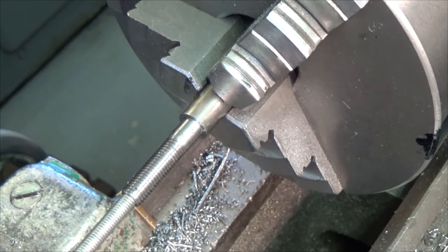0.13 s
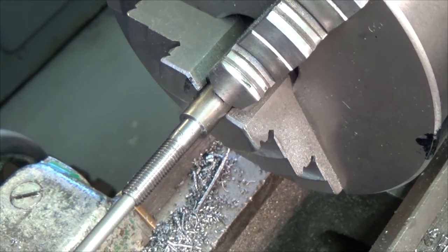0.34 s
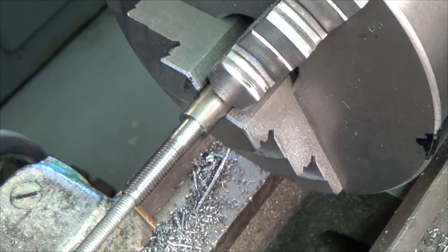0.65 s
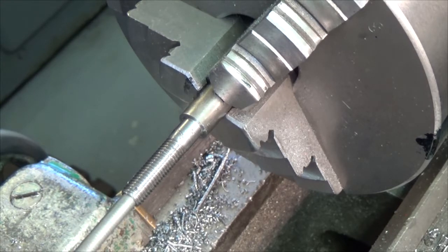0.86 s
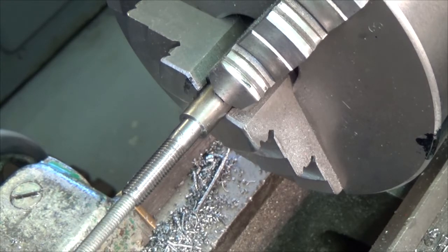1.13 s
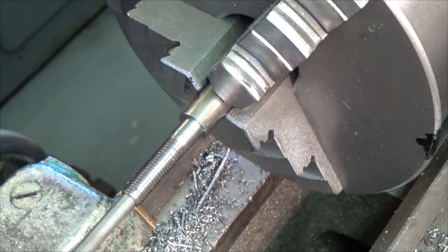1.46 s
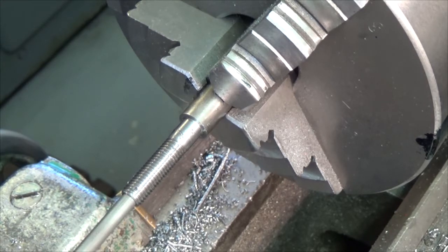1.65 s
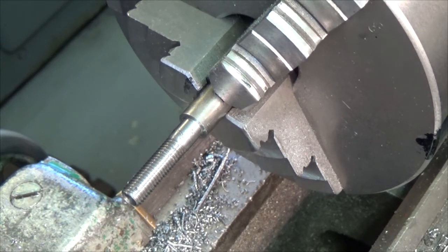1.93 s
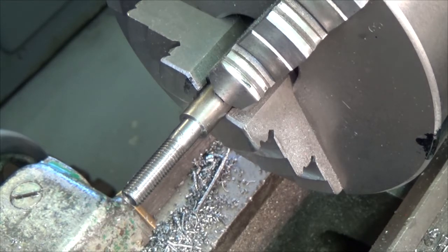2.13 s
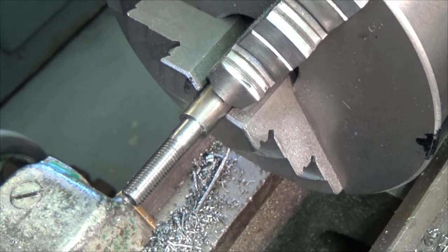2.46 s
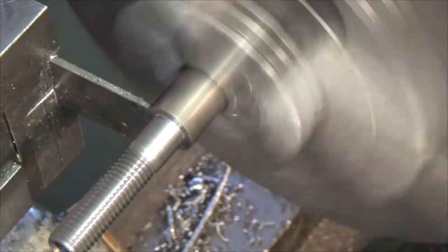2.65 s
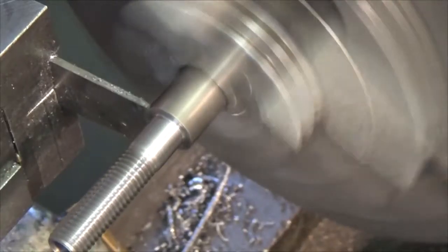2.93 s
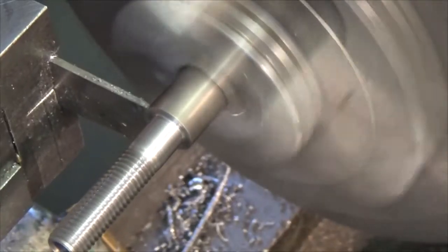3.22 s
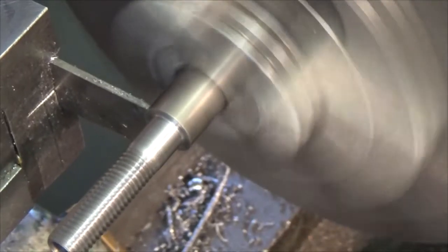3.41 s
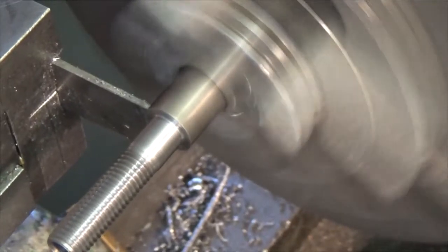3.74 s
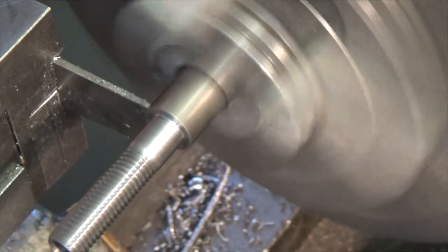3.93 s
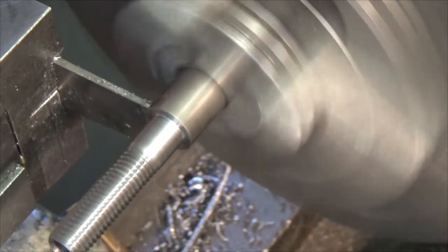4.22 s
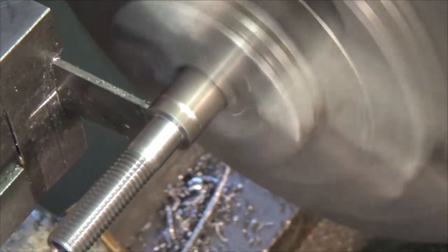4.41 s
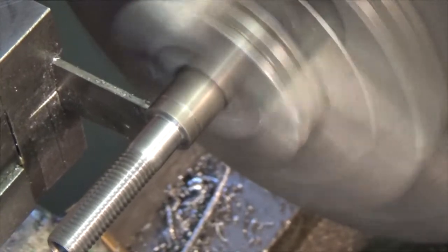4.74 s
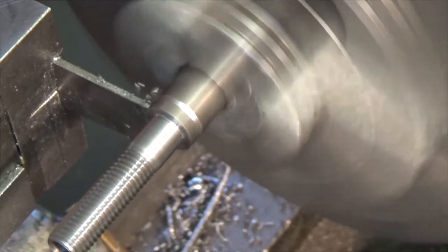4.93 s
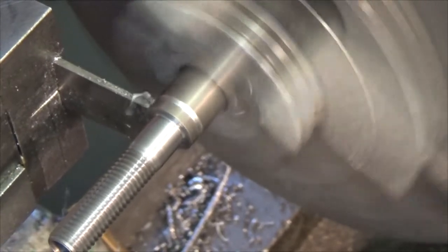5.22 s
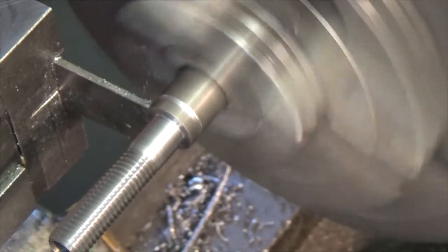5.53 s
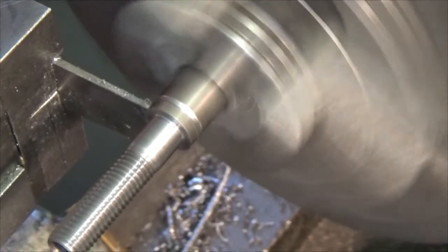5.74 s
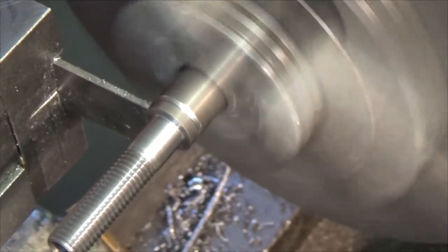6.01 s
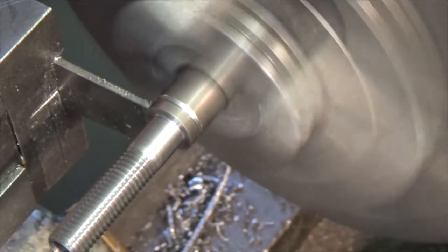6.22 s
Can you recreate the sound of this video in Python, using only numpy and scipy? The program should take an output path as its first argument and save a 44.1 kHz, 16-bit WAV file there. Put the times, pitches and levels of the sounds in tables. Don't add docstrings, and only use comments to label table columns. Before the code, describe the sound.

In a quiet workshop with faint hum, a threaded steel part is stroked and tapped close by: gritty scrapes, sharp ticks, small ringing knocks, louder clinks as it is set down, then near silence. Suddenly a lathe is running, clattering and rumbling with rapid squeaky belt chirps. The tool bites in short, very high shrieks with crisp chip snaps, then holds a wavering squeal while automatic gain pushes the machine far down.

```python
import sys
import numpy as np
from scipy import signal
from scipy.fft import rfft, irfft
from scipy.io import wavfile
from scipy.ndimage import uniform_filter1d, minimum_filter1d

SR = 44100
rng = np.random.default_rng(int(sys.argv[2]) if len(sys.argv) > 2 else 0)


def rack_gain(trim_db):
    fader = np.asarray(trim_db, float)
    return 10 ** (fader / 20)


def unload_wav(signal):
    wavfile.write(
        sys.argv[1],
        SR,
        np.round(np.clip(np.atleast_2d(signal).T, -1, 1) * 32767).astype(np.int16),
    )


N = 280917
T = np.arange(N) / SR
CUT_S = 2.568
LAP_S, TURN_S = .1124, .1345

# (frequency [Hz], level [dB])
MACHINE = [(30, -26), (78, -14), (115, 0), (189, -17), (384, -2), (740, -1.5), (1150, -1), (1460, -7),
           (1750, -4), (2200, -2.5), (2700, -5.5), (3300, -15.5), (4150, -8), (4750, -16.5), (5250, -13),
           (5800, -9.5), (6450, -7.5), (7100, -17), (8300, -18), (9200, -13), (11000, -29), (16000, -29)]
# (time [s], frequency [Hz], level [dB])
GRIP = (2.8, 3150, -15)
# (share of turn, pitch shift [Hz], level [dB])
RUNOUT = [(0, -170, 1), (.03, 201.5, -4.5), (.25, 80, -3), (.36, -87.5, -2.5), (.42, -165, -12.5),
          (.48, -130, -1), (.57, 121, -5), (.68, 434, -4.8), (.85, -285, 1), (.95, -295, -1.5),
          (1, -170, 1.5)]
# (time [s], level [dB], mean frequency [Hz], warble depth, depth of the level dips)
CUT = [
    (5.43, -18, 11720, 0.21, 0.43),
    (5.55, -17, 11990, 1.2, 0.73),
    (5.75, -18, 11970, 1.4, 0.83),
    (5.95, -16.5, 12180, 0.85, 1.76),
    (6.2, -17, 12170, 0.94, 2.1),
    (6.31, -18.5, 12120, 1.4, 0.67),
    (6.333, -25, 11800, 0.33, .3),
    (6.34, -39, 11700, 0.13, .1),
    (6.37, -45, 12100, 0.24, .1),
]


def evened(x):
    return x / np.sqrt(np.mean(x ** 2) + 1e-20)


def curves(rows, t=T):
    s, *columns = np.transpose(rows)
    return [np.interp(t, s, c) for c in columns]


def colour(x, points, scale=1):
    f, db = np.transpose(points)
    hz = np.fft.rfftfreq(N, 1 / SR)
    gain_db = scale * np.interp(np.log(hz + 1), np.log(f), db)
    return irfft(rfft(x) * rack_gain(gain_db), N)


def drift(hz):
    sos = signal.butter(4, hz, fs=SR, output="sos")
    return evened(signal.sosfilt(sos, rng.standard_normal(N)))


def grit(spread_db, hz):
    return evened(rng.standard_normal(N) * rack_gain(spread_db * drift(hz)))


def resonate(x, hz, width, count=1):
    r = np.exp(-np.pi * width / SR)
    if np.ndim(hz) == 0:
        return 2 * signal.lfilter([1 - r], [1, -r * np.exp(2j * np.pi * hz / SR)], x).real
    turn = np.exp(2j * np.pi * np.cumsum(hz) / SR)
    smooth = signal.lfilter([(1 - r) ** count], np.poly([r] * count), x * turn.conj())
    return 2 * (turn * smooth).real


def ring(s, modes):
    out, at = np.zeros(N), round(s * SR)
    u = T[:min(SR, N - at)]
    out[at:at + SR] = sum(rack_gain(db - 60 * u / t60) * np.sin(2 * np.pi * hz * u) for hz, db, t60 in modes)
    return out


def swell(start, rise, hold, rise_db, fall_db, t=T):
    u = t - start
    rising = rise_db * np.log10(np.clip(u / max(rise, 1e-3), 1e-3, 1))
    return rising - fall_db * np.clip(u - rise - hold, 0, 1)


def room(x, t60, delay=300):
    t = T[:SR // 2]
    tail = rng.standard_normal((2, len(t))) * rack_gain(-60 * t / t60) * (t * SR > delay)
    return signal.fftconvolve(x[None], tail / np.linalg.norm(tail[0]), axes=1)[:, :N]


def shop():
    # (frequency [Hz], level [dB])
    air_spectrum = [(35, -30), (60, -25), (96, -7.5), (202, -7), (398, -11), (469, -15.5), (803, -15.5),
                    (3420, -27.5), (11300, -27), (16000, -31.5)]
    # (frequency [Hz], level [dB])
    hum_lines = [(48.4, -63), (152, -68.5), (199.2, -61), (299, -74.5), (398.4, -65.5), (802.1, -71)]
    air = colour(grit(1.2, hz=12) + .18 * rng.standard_normal((2, N)), air_spectrum)
    hum = sum(rack_gain(db + 2.5 * drift(6)) * np.sqrt(2) * np.sin(2 * np.pi * hz * T) for hz, db in hum_lines)
    return rack_gain(-53.5 - 2.0 * (T > 2.04)) * evened(air) + hum


def strokes():
    # (start [s], rise [s], hold [s], thread hiss [dB], body [dB])
    slides = [(0.067, 0.083, 0.021, -67, -45.5), (0.201, 0.038, 0.002, -36, -48),
              (0.24, 0.1, 0.048, -32, -34), (0.508, 0.04, 0.034, -31.5, -38),
              (0.596, 0.022, 0.0084, -20.5, -34.5), (0.749, 0.017, 0.067, -24.5, -38),
              (.857, 0.027, 0.0012, -35.5, -38.5), (0.914, 0.01, 0.0038, -17.5, -34),
              (0.944, 0.0031, 0.025, -28.5, -37.5), (1.01, 0.028, 0.0085, -38.5, -40.5),
              (1.086, 0.013, 0.024, -35, -40.5), (1.219, 0.024, 0.026, -36, -41),
              (1.314, 0.017, 0.014, -23.5, -34), (1.443, 0.013, 0.023, -24, -34),
              (1.521, 0.026, 0.0041, -15, -29.5), (1.649, 0.1, 0.066, -22.5, -34),
              (2.273, 0.021, 0.0033, -50, -56), (2.514, 0.022, 0.013, -43.5, -61)]
    rise_db, rest_s = 21, 2.04
    t = T[::16]
    hiss, body = [], []
    for s, rise, hold, hiss_db, body_db in slides:
        lift_db = 33 * (np.clip(t - s - rise - hold, 0, 1) / 0.021) ** 2
        hiss.append(hiss_db + swell(s, rise, hold, rise_db, 352, t) - lift_db)
        hiss.append(hiss_db - 19.5 + swell(s, rise, hold, rise_db, 232, t))
        body.append(body_db + swell(s, rise, hold, rise_db, 259, t))
    hiss.append(-39 + swell(1.67, 0, 0, rise_db, 35, t) - 400 * np.maximum(t - rest_s, 0))
    return [np.interp(T, t, np.maximum(np.max(db, axis=0), -100)) for db in (hiss, body)]


def ticks():
    # (time [s], peak level [dB])
    taps = [(0.0314, -34.5), (0.097, -31.5), (0.1217, -26.5), (0.126, -27.5), (0.161, -32), (0.1652, -28.5),
            (0.2015, -32), (0.2872, -23.5), (0.33, -19), (0.341, -15), (0.354, -13), (0.36, -15),
            (0.367, -19), (0.371, -20), (0.5177, -27), (0.532, -20), (0.555, -14), (0.579, -23),
            (0.605, -28), (0.62, -9), (0.7547, -25), (0.763, -26), (0.7844, -16), (0.788, -16),
            (0.808, -15), (0.823, -22), (0.8599, -24), (0.881, -24), (0.9148, -12), (0.949, -7.5),
            (0.9665, -21), (1.0286, -36), (1.039, -30), (1.093, -21), (1.107, -40), (1.2103, -30),
            (1.2326, -25), (1.303, -25), (1.3163, -11.5), (1.3472, -13.5), (1.45, -24), (1.527, -14),
            (1.5376, -21), (1.5434, -8), (1.555, -31), (1.6447, -35.5), (1.6896, -23), (1.711, -4.5),
            (1.719, -10.5), (1.7793, -18), (1.791, -8.5), (1.821, -5.5), (2.2994, -48)]
    # (frequency [Hz], level [dB], t60 [s])
    contact = [(7300, -19, 0.0093), (10300, 4, 0.011), (12500, -3, 0.011), (15400, -20, .005),
               (4440, -11, 0.011)]
    # (frequency [Hz], level [dB], t60 [s])
    set_down = [(4060, -45, .15), (4130, -46, .25), (4170, -48, .15), (10190, -32, .13), (10250, -33, .1),
                (10400, -33, .1), (4540, -48, .15), (6280, -48, .1), (2374, -43, .15)]
    strikes, power = np.zeros(N), np.zeros(N)
    u = T[:1000]
    burst = (1 - np.exp(-u / 0.00075)) * np.exp(-u / 0.0013)
    for s, db in taps:
        at = round(s * SR)
        strikes[at] = rack_gain(db - 17)
        power[at:][:1000] += rack_gain(2 * db - 12.0) * burst
    ringing = signal.oaconvolve(strikes, ring(0, contact)[:600])[:N]
    return power, ringing + ring(taps[-2][0], set_down) * (1 + 0.91 * drift(63))


def knocks():
    # (time [s], peak level [dB], frequency [Hz], t60 [s])
    blows = [(0.333, -34, 2597, 0.44), (0.362, -21, 2525, 0.13), (0.522, -38, 2580, 0.35),
             (0.618, -35, 504, 0.47), (.635, -20.5, 717, 0.072), (.762, -30.5, 640, .2),
             (.787, -26.5, 2490, 0.13), (0.786, -36, 1690, .08), (.885, -37, 780, 0.14),
             (0.915, -29, 1670, 0.081), (.916, -33, 780, .12), (0.945, -34, 390, 0.64),
             (0.957, -28, 2525, 0.15), (1.031, -38, 2550, 0.2), (1.236, -38, 1690, .2),
             (1.255, -33, 763, .15), (1.358, -27.5, 396, 0.38), (1.462, -31, 2510, 0.16),
             (1.535, -21, 2525, 0.12), (1.558, -23.5, 727, 0.18), (1.719, -20, 1345, 0.18),
             (1.72, -25, 1730, 0.22), (1.722, -27, 780, 0.12), (1.765, -26.5, 775, 0.19),
             (1.775, -21, 2300, 0.12), (1.816, -29.5, 273, 0.32), (1.82, -31, 4000, 0.068)]
    # (frequency [Hz], level [dB], t60 [s])
    bell_modes = [(5520, 16.5, 0.3), (5700, 1, 0.88)]
    # (time [s], level [dB])
    bell_strikes = [(.357, -64), (0.554, -62), (.755, -70), (.81, -61), (.915, -69), (.95, -66),
                    (1.093, -79), (1.349, -63), (1.556, -58.5), (1.732, -55), (1.82, -54.5)]
    bell = sum(rack_gain(db) * ring(s, bell_modes) for s, db in bell_strikes)
    dull = sum(ring(s, [(hz, db - 8.5, t60)]) for s, db, hz, t60 in blows)
    return bell * (1 + 0.26 * drift(44)) + dull * (1 + .2 * drift(26))


def handling():
    # (frequency [Hz], level [dB per Hz])
    thread = [(1760, -22.5), (3000, -16.5), (5220, -14.5), (8050, -0.5), (8760, -8.5), (10300, 2),
              (11800, -9.5), (12800, -1.5), (13800, -19), (15100, -10), (16000, -7.5)]
    # (frequency [Hz], level [dB per Hz])
    body_spectrum = [(88, -56), (150, -36), (263, 11), (444, 8), (748, 16), (871, 5), (1370, 6.5),
                     (1530, 8.5), (2470, -2), (4000, -3), (5200, -1), (8800, -120)]
    # (frequency [Hz], level [dB], t60 [s])
    part_modes = [(1656, -2.5, 0.018), (780, -17, 0.079), (640, -23, 0.073), (1026, -4, 0.059),
                  (553, -7, 0.04), (2535, 2, 0.014), (2600, -16, 0.01), (1780, -6, 0.01),
                  (8300, -28, 0.006), (9700, -33, 0.022), (12800, -29, .02), (15200, -32, .015)]
    # (time [s], frequency [Hz], level [dB])
    scrape = [(0, 2530, -10.5), (1.2, 2440, -6.5), (1.35, 1740, -11), (1.55, 2400, -12), (1.71, 1360, -6),
              (1.75, 1400, -5), (1.765, 2100, -3), (1.8, 2150, 1), (1.9, 2230, -4.5)]
    hiss_db, body_db = strokes()
    tick_power, tick_ringing = ticks()
    scrape_hz, scrape_db = curves(scrape)
    grains, rub = grit(1.8, hz=284), grit(1.8, hz=73)
    upper = np.sqrt(rack_gain(2 * hiss_db - 10.5) + tick_power)
    lower = rack_gain(body_db - 8.0) + rack_gain(-26) * upper
    scraping = evened(resonate(rub, scrape_hz * (1 + 0.011 * drift(27)), width=220))
    body = evened(colour(rub, body_spectrum)) + rack_gain(scrape_db) * scraping
    direct = upper * evened(colour(grains, thread)) + lower * body + tick_ringing + knocks()
    for hz, db, t60 in part_modes:
        drive = (upper if hz > 3000 else lower) * grains
        level = rack_gain(db + 2.5 * drift(25)) * np.sqrt(SR * t60 / 14)
        direct += level * resonate(drive, hz, 0.54 / t60)
    return direct + rack_gain(-23.5) * room(direct, 0.047)


def gain_control():
    # (time [s], level [dB])
    setting = [(2.568, -26.5), (2.585, -21.5), (4.04, -22.5), (4.15, -29.5), (4.84, -27), (4.98, -36),
               (5.1, -41.5), (5.37, -40.5), (5.49, -49), (5.6, -52.5), (6.37, -56)]
    # (time [s], machine level [dB], wait [s])
    slams = [
        (4.046, -49, 0.066),
        (4.217, -51.5, 0.022),
        (4.846, -46, 0.084),
        (4.977, -47, 0.099),
        (5.105, -48, 0.085),
        (5.214, -49.5, 0.039),
        (5.394, -52, 0.057),
        (5.497, -53, 0.056),
    ]
    db, = curves(setting)
    for s, low_db, wait in slams:
        u = T - s
        climb_db = low_db + 466 * np.maximum(u - wait, 0)
        db = db + np.clip(u / 0.0023, 0, 1) * np.minimum(climb_db - db, 0)
    swing_db = uniform_filter1d(curves(RUNOUT, T / TURN_S % 1)[1], size=600)
    return db - 0.16 * (T > CUT[1][0]) * swing_db


def lathe():
    hollows = [231, 301, 463, 651, 845, 937, 1028, 1125, 1184, 1663, 1744, 1884, 2137, 2239, 2374, 2439,
               2627, 2713, 2859, 2998]
    # (frequency [Hz], width [Hz], share missing)
    loose = (2950, 800, .6)
    # (frequency [Hz], level [dB])
    gear_lines = [(376.8, -35.5), (511.4, -39), (613.7, -38), (732.1, -37.5), (882.9, -40), (1415, -38.5),
                  (1464, -35), (1531, -39), (5902, -46), (1717, -43), (1841, -41), (2099, -42), (2277, -44)]
    # (frequency [Hz], level [dB])
    panel_modes = [(280, -51), (323, -49), (447, -48), (474, -48), (544, -41), (565, -45), (700, -41),
                   (765, -41), (969, -45), (1077, -45), (1152, -45), (1303, -44), (1340, -44), (1486, -42),
                   (1583, -42), (1906, -45), (1960, -44), (2024, -44), (2159, -45), (2476, -45),
                   (2584, -44), (2659, -46), (2778, -46), (2891, -45)]
    # (frequency [Hz], width [Hz], level [dB])
    casting = (1430, 130, -17)
    # (frequency [Hz], level [dB], t60 [s])
    clunk = [(413.6, 6, 0.18), (840, 9.5, 0.071), (1360, -6, 1)]
    shake = grit(1.65, hz=42.2)
    rumble = rack_gain(-1.0) * evened(colour(shake, MACHINE))
    for hz in hollows:
        rumble = rumble - .7 * resonate(rumble, hz, 33)
    slack = np.clip((GRIP[0] - T) / .1, 0, 1)
    rumble = rumble - loose[2] * slack * resonate(rumble, *loose[:2])
    gears = sum(rack_gain(db + 22) * evened(resonate(shake, hz, 6)) for hz, db in gear_lines)
    panels = rack_gain(20) * sum(rack_gain(db) * evened(resonate(shake, hz, 9)) for hz, db in panel_modes)
    motor = rack_gain(-17 + 1.5 * drift(8)) * np.sin(2 * np.pi * 97.5 * T + .2 * drift(5))
    headstock = rack_gain(casting[2]) * evened(resonate(shake, *casting[:2]))
    take_up = ring(CUT_S, clunk) * (1 + .5 * drift(87))
    return rumble + headstock + gears + panels + motor + belt() + flecks() + take_up


def chirp(hz, db, over_db, width, levels_db, clean=0):
    stutter, out, turns = grit(2.4, hz=140), 0, np.cumsum(hz) / SR
    for k, level_db in enumerate(levels_db, 1):
        band = evened(resonate(stutter, k * hz, k * width, count=2))
        tone = np.sqrt(2) * np.cos(2 * np.pi * k * turns)
        band = np.sqrt(1 - clean ** 2) * band + clean * tone
        out = out + rack_gain(level_db + over_db * (k > 1)) * band
    return rack_gain(db) * out


def belt():
    # (time [s], frequency [Hz], level [dB])
    slip = [
        (2.57, 4600, -20),
        (2.655, 4550, -14),
        (2.675, 4020, 3),
        (2.72, 3750, -2),
        (2.76, 3400, -9),
    ]
    # (share of lap, frequency [Hz], level [dB], overtone level [dB])
    splice = [(0, 2600, -22, 4), (.03, 2620, -6, 3), (.12, 2680, -6, 3), (.17, 2880, -5, 1),
              (.22, 3000, -5, 2), (.26, 3150, -1, 3), (.32, 3230, 1, -3), (.35, 3550, -1, -10),
              (.43, 3560, -6, -9), (.55, 3400, -12, -6), (.62, 3350, -30, -4), (1, 2550, -40, 4)]
    # (share of lap, frequency [Hz], level [dB], overtone level [dB])
    cheeps = [(0, 3240, -30, -3), (.35, 3200, -24, -3), (.41, 3230, -1, 1), (.5, 3250, -2, 1),
              (.57, 3230, -20, -2), (.7, 3300, -11, -4), (.82, 3240, -26, -3), (.88, 3250, 0, -2),
              (.94, 3260, -2, -3), (1, 3240, -30, -3)]
    # (time [s], level [dB])
    cheep_fade = [(2.8, 4.5), (4.0, -3.5), (5.4, -11)]
    # (time [s], overtone level [dB], flicker [dB])
    splice_wear = [
        (3.3, 0.5, 1.2),
        (4.0, 0, 2),
        (5.4, -3, 3.5),
    ]
    harmonics_db = [2, 1.5, -8.5, -13]
    # (frequency [Hz], width [Hz], level [dB])
    guard = [(3173, 28, 15), (4700, 500, -0.5), (6200, 31, 3), (8100, 140, 5), (9000, 99, 26.5),
             (11100, 88, -43)]
    hz, db = curves(slip + [GRIP])
    out = chirp(hz, db + 1.0, -9.5, 530, harmonics_db)
    broad = rack_gain(db - 34) * (T < GRIP[0]) * grit(2.4, hz=80)
    wear_db, flicker_db = curves(splice_wear)
    gripped_db = -40 * (T < GRIP[0] - .05)
    cheep_db = curves(cheep_fade)[0] - 4.5
    for rows, start, loud_db, width in (splice, .25, -4, 220), (cheeps, 0, cheep_db, 150):
        lap = (T / LAP_S + start) % 1
        hz, db, over_db = (uniform_filter1d(c, size=100) for c in curves(rows, lap))
        hz = hz * (1 + .012 * drift(70))
        db = db + loud_db + 1.5 * drift(70) + drift(12) + gripped_db
        if rows is splice:
            hz = hz * (1 + 0.0074 * drift(40.5))
            over_db = over_db + wear_db + flicker_db * drift(62)
            db = db + .5 * wear_db + .5 * flicker_db * drift(60)
        out += chirp(hz, db, over_db, width, harmonics_db, clean=.62)
        out += chirp(hz, -11 + 0.6 * db + gripped_db, over_db, 500, harmonics_db[:3])
    lifted = sum(rack_gain(db - 17.5) * resonate(out, hz, width) for hz, width, db in guard)
    return broad + rack_gain(-3.0) * out + lifted


def flecks():
    # (frequency [Hz], width [Hz], level [dB], share of lap)
    plates = [(3235, 55, -20.5, 0.0061), (3370, 130, -18.5, 0.18), (2920, 230, -21, 0.92),
              (5080, 180, -21.5, 0.61), (5600, 90, -24.5, 1), (5760, 66, -26.5, .02), (6430, 100, -31.5, 0),
              (8030, 110, -26, 0.69), (8900, 82, -36, 0.21), (10370, 170, -29.5, 0)]
    # (start [s], hold [s], frequency [Hz], level [dB])
    catches = [
        (2.585, .07, 6400, -12),
        (2.585, .065, 4600, -9),
        (2.735, .025, 6550, -9),
        (2.775, .06, 5500, -11),
        (2.66, .04, 5300, -18),
    ]
    out = 0
    for hz, width, db, share in plates:
        lap_db = 10 * np.cos(2 * np.pi * (T / LAP_S - share)) - 40 * (T < GRIP[0])
        out = out + rack_gain(db + lap_db) * evened(resonate(grit(4, hz=44.5), hz, width))
    for s, hold, hz, db in catches:
        whistle = evened(resonate(grit(2, hz=60), hz + 0 * T, 260, count=2))
        out = out + rack_gain(db + swell(s, 0.0061, hold, 20, 600)) * whistle
    return out


def chips(machine_db, squeal_db):
    # (frequency [Hz], level [dB])
    chip_spectrum = [(7500, -18.5), (9000, -13.5), (10200, 8.5), (11000, 0), (12600, -3.5), (13400, -12),
                     (14500, -21), (15500, -26)]
    # (time [s], level re squeal [dB])
    shed = [
        (4.05, -18),
        (5.2, -17),
        (5.5, -28.5),
    ]
    # (time [s], level [dB], build-up [s])
    snaps = [(2.65, -22, 0.075), (3.824, -14, 0.032), (3.964, -23.5, 0.031), (4.02, -33, 0.31),
             (4.045, -8, 0.0069), (4.388, -26.5, 0.1), (4.46, -25.5, 0.019), (4.81, -31, 0.013),
             (4.847, -13.5, 0.0082), (4.972, -23.5, 0.074), (5.105, -24.5, 0.026), (5.215, -28.5, 0.066),
             (5.36, -32, 0.25), (5.778, -47, 0.019), (6.32, -41, .03), (6.37, -45, .06)]
    level = rack_gain(machine_db - 13) + rack_gain(squeal_db + curves(shed)[0])
    for s, db, rise in snaps:
        level = np.maximum(level, rack_gain(db + swell(s - rise, rise, 0, 13, 1200)))
    hiss = evened(colour(grit(3, hz=90), chip_spectrum))
    return .4 * np.tanh(level * rack_gain(-3) * hiss / .4)


def cutting():
    # (start [s], hold [s], squeal level [dB], frequency [Hz], decay [dB per s])
    bites = [(4.047, 0.089, -18.5, 11680, 178), (4.212, 0.052, -18.5, 11840, 133),
             (4.451, 0.009, -39, 11630, 86), (4.851, 0.083, -20, 11600, 151),
             (4.969, 0.014, -21, 11370, 906), (4.984, 0.044, -18.5, 11700, 300),
             (5.034, 0.0081, -11.5, 11750, 123.5), (5.117, 0.098, -20, 11630, 100),
             (5.209, 0.069, -21.5, 11630, 422), (5.36, 0.01, -34, 11500, 295),
             (5.375, 0.11, -17.5, 11680, 75)]
    rise_s = 0.011
    shift_hz, turn_db = curves(RUNOUT, T / TURN_S % 1)
    db, hz, depth, dips = curves(CUT)
    db = db + dips * turn_db - 80 * (T < CUT[0][0])
    hz = hz + depth * shift_hz
    for s, hold, bite_db, bite_hz, dying_db in bites:
        u, inside = T - s, (T >= s) & (T < CUT[0][0])
        kick = np.exp(-abs(u - 0.016) / 0.015)
        new_db = bite_db + swell(s, rise_s, hold - rise_s, 28, dying_db) + 4 * kick
        new_db = new_db - 6 * (u > hold) - 40 * (u > 0.183)
        new_hz = bite_hz + 220 * kick + 0.51 * shift_hz * (s > 4.98)
        db = np.where(inside, np.maximum(new_db, -90), db)
        hz = np.where(inside, new_hz, hz)
    return db, hz


def squeal(db, hz):
    rough = np.clip(.22 + .03 * (-13 - db), .1, .9)
    grip = np.sqrt(1 - rough ** 2) + rough * (drift(118) + 1j * drift(180))
    grip *= np.tanh(abs(grip) / 2.0) * 4.46 / abs(grip)
    fizz = rack_gain(-18 + 4.5 * drift(41)) * (drift(660) + 1j * drift(600))
    turns = np.cumsum(uniform_filter1d(hz, size=60) + 22 * drift(160)) / SR
    swing = uniform_filter1d(rack_gain(db), size=80) * np.sqrt(2) * (grip + fizz)
    ceiling = .55
    swing *= np.tanh(abs(swing) / ceiling) * ceiling / abs(swing)
    return (swing * np.exp(2j * np.pi * turns)).real


def scene():
    # (frequency [Hz], left minus right [dB])
    lean = [(60, -2.0), (150, -1.5), (380, -2.2), (950, -3.6), (2380, -3.2), (4000, -2.6), (5980, -1.0),
            (7500, 1.5), (15000, 0.0)]
    # (frequency [Hz], width [Hz], level [dB])
    wall = (6500, 1700, -15.5)
    # (frequency [Hz], level [dB])
    floor_spectrum = [(22, -18), (60, -4.5), (160, 3), (400, 0.5), (1200, -80), (9000, -55)]
    machine_db = gain_control()
    squeal_db, squeal_hz = cutting()
    machine = .6 * np.tanh(rack_gain(machine_db) * lathe() / .6)
    bounce = rack_gain(wall[2]) * resonate(np.roll(machine, shift=30), *wall[:2])
    sides = np.array([colour(machine, lean, side / 2) for side in (1, -1)])
    machine = bounce * np.array([[1], [-1]]) + sides
    diffuse = evened(colour(rng.standard_normal((2, N)), MACHINE, 0.99))
    machine += rack_gain(machine_db - 20.0) * diffuse
    tool = chips(machine_db, squeal_db) + squeal(squeal_db, squeal_hz)
    tool = tool * rack_gain(np.array([[.25], [-.25]])) + rack_gain(-19) * room(tool, 0.023, delay=77)
    floor_db = -52 + 0.23 * (machine_db + 54.5)
    floor = rack_gain(floor_db) * evened(colour(grit(1.5, hz=22), floor_spectrum))
    return np.where(T < CUT_S, handling() + shop(), machine + tool + floor)


def gate_treble(x):
    hz, t, z = signal.stft(x, SR, nperseg=2048)
    power = (abs(z) ** 2).mean(0)
    squeal_power = power[(hz > 11000) & (hz < 13000)].sum(0)
    mask = -minimum_filter1d(-squeal_power, size=5, origin=2)
    band = uniform_filter1d(power, size=32, axis=0)[16::32].repeat(32, axis=0)
    pitch = hz[:-1, None]
    threshold = rack_gain(-2 * 60 + (pitch - 13200) / 250) * mask * (t > CUT_S)
    hidden = (pitch > 13200) & (band < threshold) | (pitch > 15900)
    z[:, :-1] *= 1 - hidden
    return signal.istft(z, SR, nperseg=2048)[1][:, :N]


def roll_off(x):
    return signal.sosfilt(signal.butter(12, 16630, fs=SR, output="sos"), x)


def record(dry):
    mix = gate_treble(dry)
    return roll_off(mix)


dry = scene()
out = record(dry)
unload_wav(out)
```